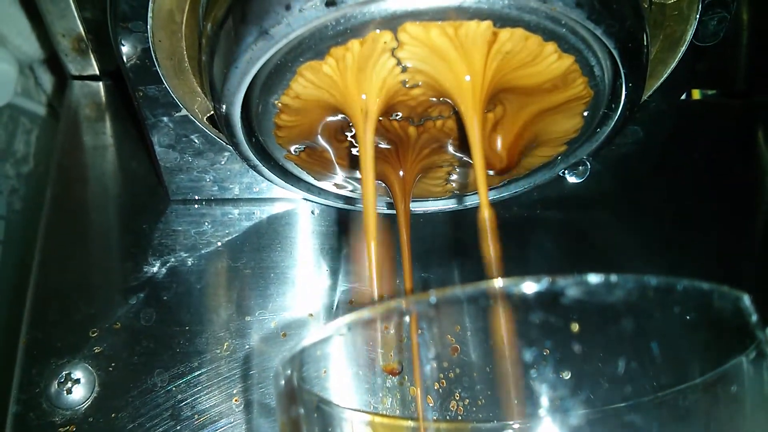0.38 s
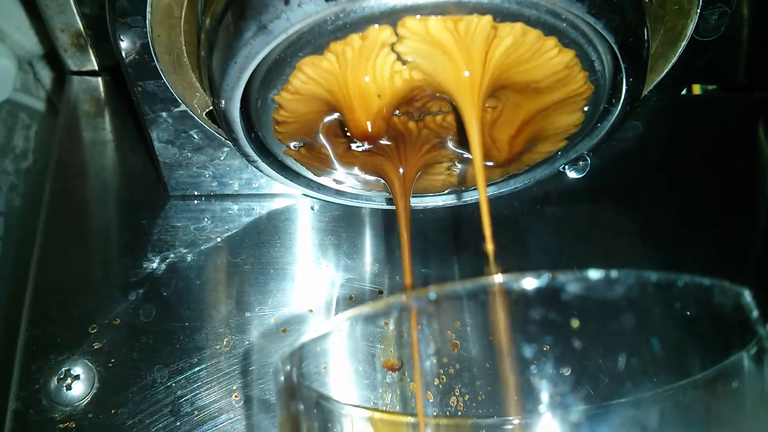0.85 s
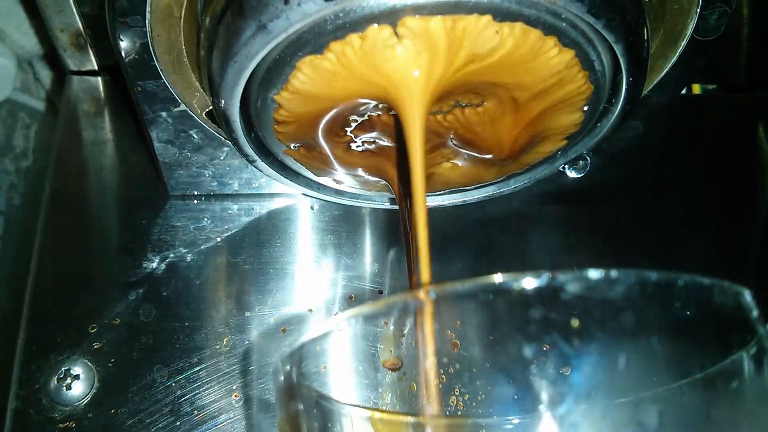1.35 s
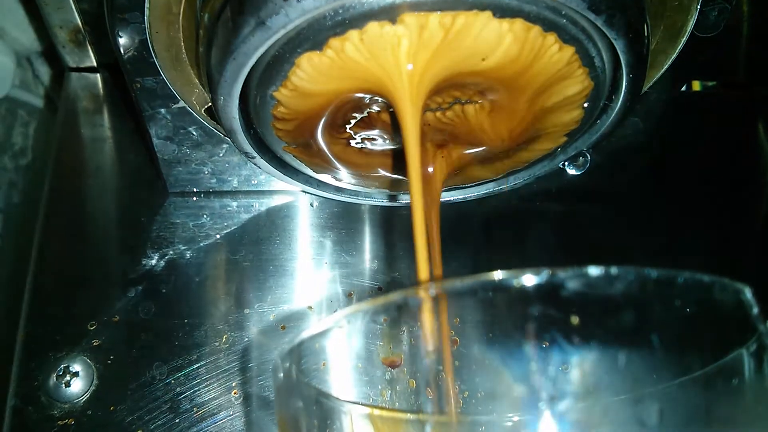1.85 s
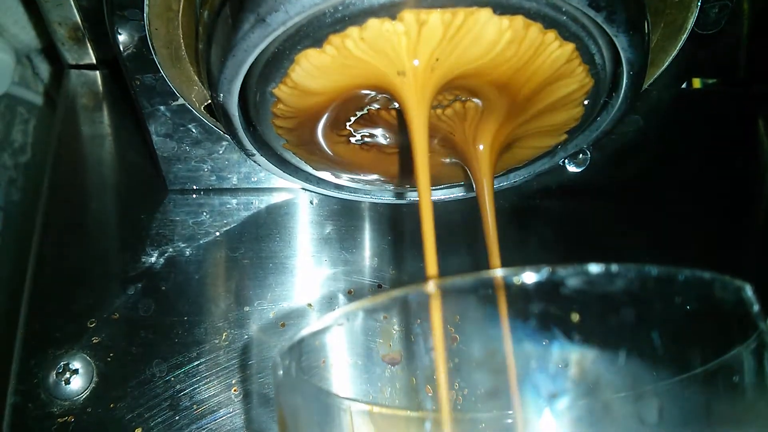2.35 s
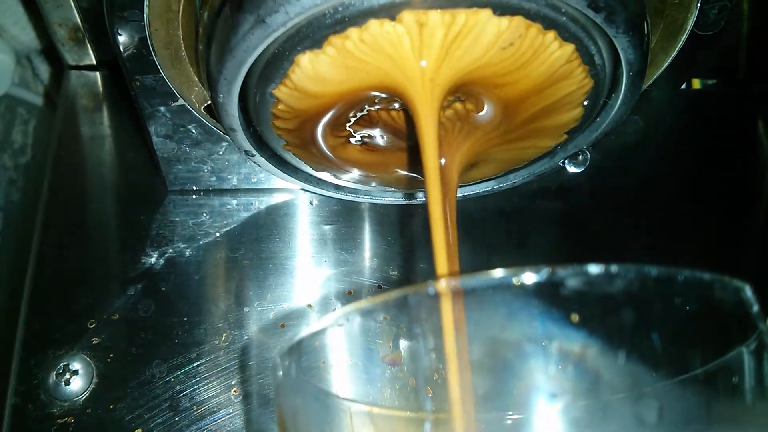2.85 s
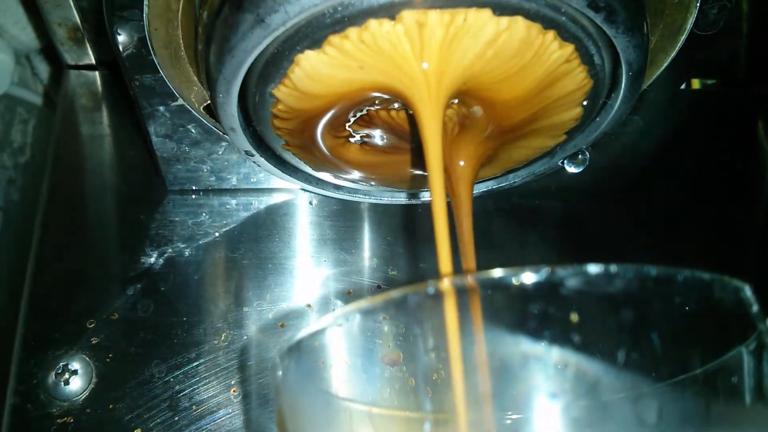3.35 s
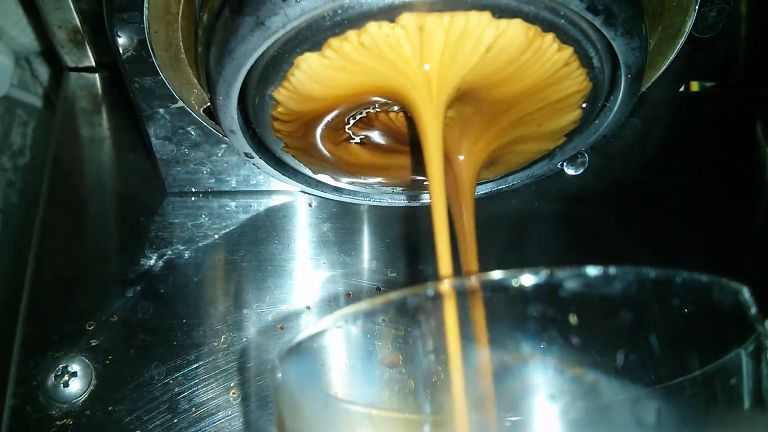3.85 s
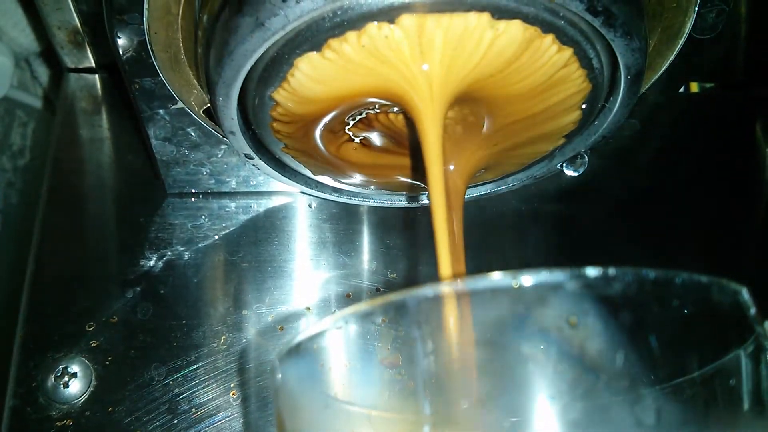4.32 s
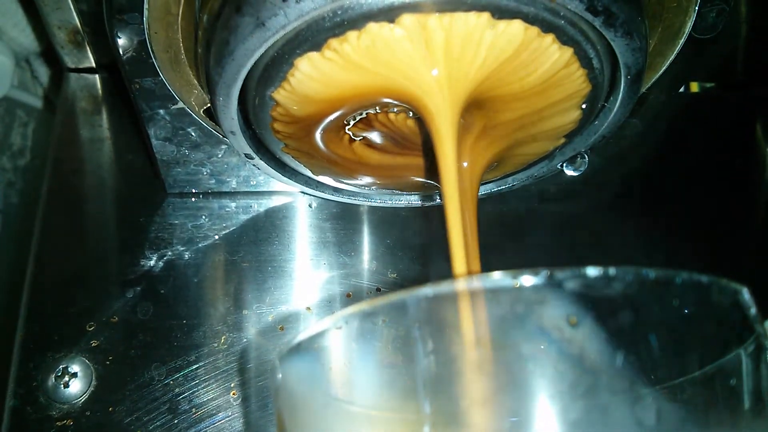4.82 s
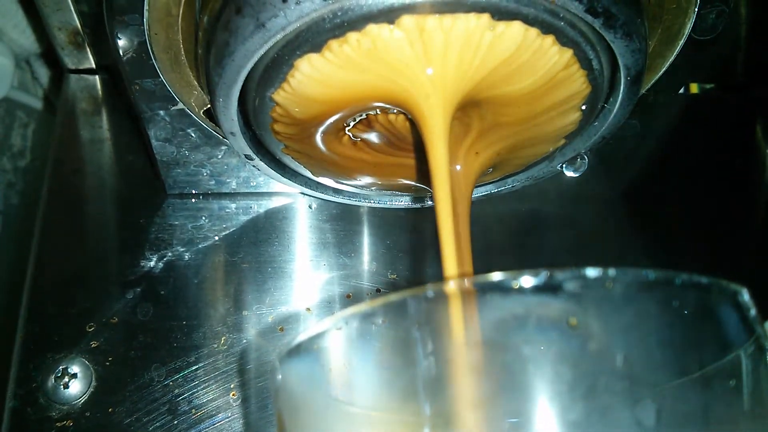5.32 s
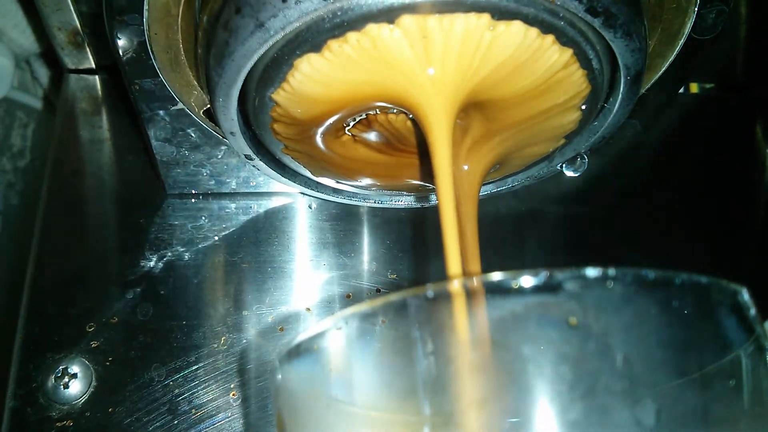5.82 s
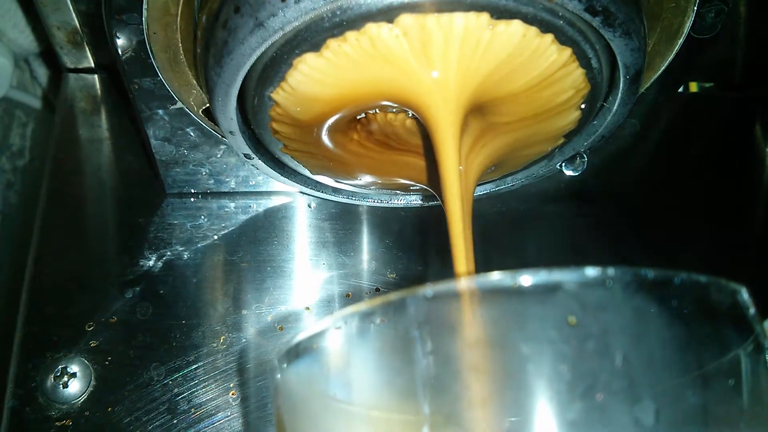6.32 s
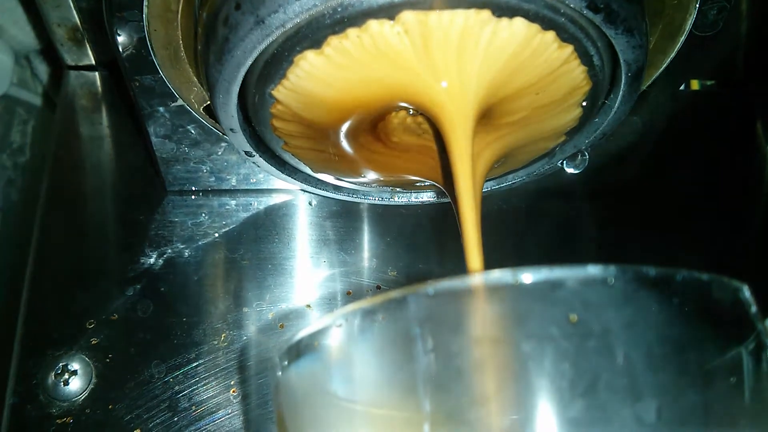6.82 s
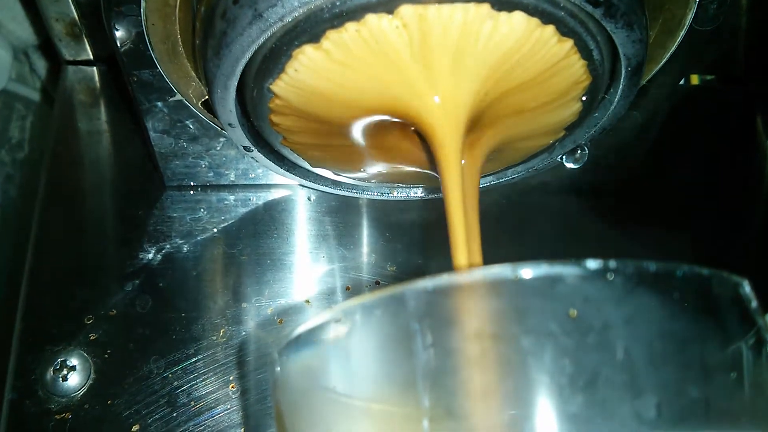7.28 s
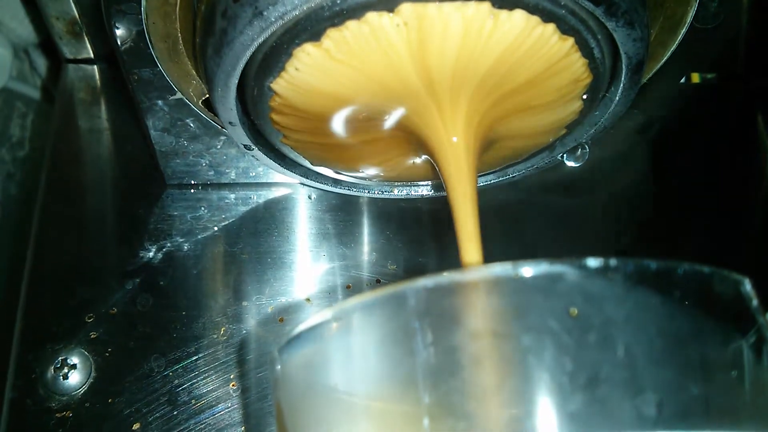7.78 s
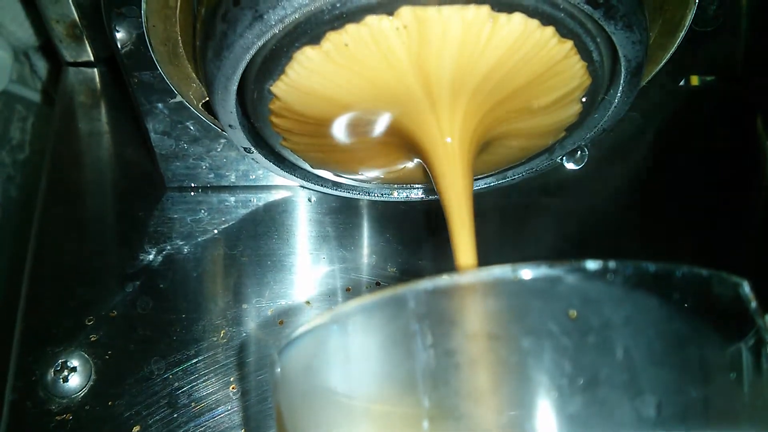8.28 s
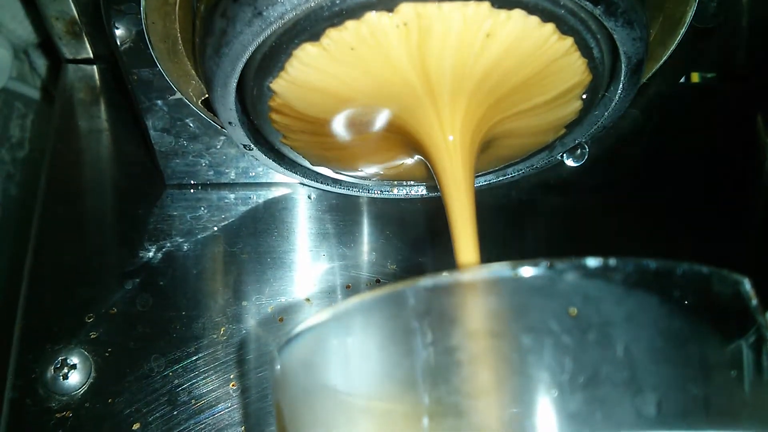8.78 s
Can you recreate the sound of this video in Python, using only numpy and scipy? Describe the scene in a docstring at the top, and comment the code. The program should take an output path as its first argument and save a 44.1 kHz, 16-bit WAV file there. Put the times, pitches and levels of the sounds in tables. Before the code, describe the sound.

Close under an espresso machine's brew head, a vibrating pump buzzes without pause at about fifty strokes a second. A loose metal part adds a crisp, fizzing rattle with irregular harder ticks. Small, short drips plink into a glass cup, mostly early on, over a soft trickle and quiet kitchen air. The buzz slowly settles and softens a little but never stops.

```python
"""Vibrating pump of an espresso machine

The pump makes one piston stroke per mains cycle, heard close under the brew head. Its casing hums as a
harmonic series on the stroke rate, with chance pushes ringing the panels through resonant modes.
A loose metal part rattles after each blow as shaped noise bursts, coffee drips into a glass cup as
decaying bubble tones, and filtered noise gives the room and the trickle."""
import sys
import numpy as np
from scipy import signal
from scipy.fft import rfft, irfft, next_fast_len
from scipy.io import wavfile
from scipy.ndimage import uniform_filter1d, map_coordinates

SR = 44100
rng = np.random.default_rng(int(sys.argv[2]) if len(sys.argv) > 2 else 0)


def decibels_to_gain(level_db):
    """Convert a level in decibels to a linear amplitude gain (20 dB per decade)."""
    exponent = np.asarray(level_db, float) / 20
    return 10 ** exponent


def store_pcm(level_fs):
    """Save levels as 16-bit WAV."""
    pcm = np.round(np.clip(level_fs, -1, 1) * 32767).astype(np.int16)
    wavfile.write(sys.argv[1], SR, np.atleast_2d(pcm).T)


N = 403515  # length in samples

# Mains frequency, which sets the stroke rate. Each row: time in seconds, frequency in Hz.
MAINS = [(0, 49.998), (5.8, 49.998), (7, 49.989), (9.2, 49.988)]
# Spectrum of the casing hum at three stages as the pressure settles: early, midway and late.
# Each row: multiple of the stroke rate, level in dB relative to the hum level.
EARLY_ORDERS = [(1, -13), (2, -22.5), (3, -18.5), (4, -10.5), (5, -1.5), (6, 1), (7, -8.5), (8, -7.5),
                (9, -5), (10, -1), (11, 1.5), (12, 0), (13, -27), (14, -20.5), (15, -17.5), (16, -9),
                (17, -11.5), (18, -11), (19, -9.5), (20, -15.5), (21, -22), (22, -36), (23, -15.5),
                (24, -15), (25, -9), (26, -42), (27, -44), (28, -19), (29, -23), (30, -15.5), (31, -24),
                (32, -16), (33, -11), (34, -10), (35, -23), (36, -4.5), (37, -15), (38, -14), (39, -19),
                (40, -38), (41, -31), (42, -58), (43, -30), (44, -54), (45, -37)]
MIDWAY_ORDERS = [(1, -12), (2, -20), (3, -14), (4, -16.5), (5, -13.5), (6, -1), (7, -13), (8, -10), (9, 2),
                 (10, -11), (11, -9.5), (12, -17.5), (13, -27), (14, -16), (15, -25.5), (16, -18),
                 (17, -37.5), (18, -20.5), (19, -17), (20, -16.5), (21, -20), (22, -30), (23, -22),
                 (24, -39), (25, -22), (26, -29), (27, -15), (28, -12), (29, -15), (30, -13), (31, -25),
                 (32, -39), (33, -60), (34, -58), (35, -37), (36, -23.5), (37, -27), (38, -16.5), (39, -18),
                 (40, -43), (41, -27.5), (42, -44), (43, -30), (44, -39), (45, -27.5)]
LATE_ORDERS = [(1, -7), (2, -16.5), (3, -6.5), (4, -0.5), (5, -11.5), (6, -3.5), (7, -14), (8, -11), (9, 1),
               (10, -7), (11, -5), (12, -11.5), (13, -31.5), (14, -15), (15, -13.5), (16, -6.5),
               (17, -22.5), (18, -9.5), (19, -10.5), (20, -11), (21, -14), (22, -19), (23, -9.5), (24, -18),
               (25, -13), (26, -44), (27, -22), (28, -16), (29, -25), (30, -15.5), (31, -18), (32, -15.5),
               (33, -30), (34, -34), (35, -24), (36, -8), (37, -17.5), (38, -16.5), (39, -26), (40, -30),
               (41, -27), (42, -32), (43, -30.5), (44, -42), (45, -23.5)]
# Course of the hum. Each row: time in seconds, hum level in dB,
# settling (0 early, 1 midway, 2 late), extra level of the deep drone near 300 Hz in dB.
HUM_COURSE = [(0, -41, 0.16, 2.5), (.8, -41.5, 0.2, -0.5), (1.5, -41.5, 0.31, -2), (2.2, -40.5, 0.47, -5),
              (3, -41, 0.71, 1), (4.3, -41.5, 0.87, -0.2), (5.2, -43, 1.3, 3.1), (6, -42, 1.37, 1.8),
              (7, -43.5, 1.49, -4), (8, -45, 1.82, 3), (9.15, -45.5, 1.93, 2)]
# Slow course of the rattle's middle band, before lulls. Each row: time in seconds, level in dB.
RATTLE_COURSE = [(0, -33), (2.8, -32.5), (3.9, -33.5), (5.2, -35), (6, -35), (6.9, -33), (8, -35.5),
                 (9.15, -34.5)]
# Strokes that slam harder. Each row: time in seconds, nominal peak in dB before the travel limit.
SLAMS = [(0.1431, -19), (0.183, -16), (0.3032, -20), (0.5641, -17), (0.623, -18.5), (0.6634, -13.5),
         (0.7432, -21), (0.824, -19.5), (0.8634, -19), (1.0031, -20), (1.063, -20), (1.0829, -18.5),
         (1.1633, -22.5), (1.263, -17), (1.3034, -18), (1.3433, -15.5), (1.4431, -19), (1.5833, -22.5),
         (1.7634, -17), (2.0632, -20), (2.0852, -21), (2.1041, -16), (2.1839, -14.5), (2.4234, -19),
         (2.4628, -18), (2.6633, -21), (2.804, -18.5), (2.9841, -20), (3.0844, -18), (3.2231, -21),
         (3.683, -18), (4.2033, -18.5), (4.2443, -23), (4.4243, -19.5), (4.5042, -17.5), (4.7431, -17),
         (5.7438, -23), (5.8232, -21.5), (6.2642, -16.5), (6.9227, -19), (7.3637, -23), (7.5233, -25),
         (7.7433, -25), (8.1439, -21), (8.2043, -21), (8.3833, -22), (8.8443, -17.5), (9.0024, -23)]
# Modes of the rattling part. Each row: centre in Hz, width in Hz, gain over the broad colour in dB.
PART_MODES = [(3920, 370, -9.5), (4690, 71, -5.5), (5730, 58, -4.5), (6070, 64, 2.5), (6544, 72, 6),
              (6990, 45, 3), (7296, 220, 1.5), (7570, 88, -2), (8090, 35, 4), (8150, 64, -7),
              (8300, 39, -14.5), (8810, 115, -3), (8890, 44, -3.5), (10760, 160, -8), (11480, 180, -8),
              (13200, 73, -16), (13500, 90, -7), (15200, 150, -6)]
# Broad colour of the rattle. Each row: frequency in Hz, relative density in dB per Hz.
SIZZLE = [(3300, -32), (3900, -18.5), (4400, -25), (4700, -20), (5400, -16.5), (5800, -9.5), (6900, -9),
          (7350, -3), (8800, .5), (9300, -3.5), (9600, -11), (13500, -14), (15000, -15.5), (15800, -20)]
# Rattle strength within one stroke. Each row: share of the cycle, relative level in dB.
STROKE_SHAPE = [(0, -15.5), (.1, -14), (.12, -5), (.2, -1.6), (.45, -3), (.6, -7), (.78, -10.5),
                (.88, -14.5), (1, -15)]
# Drops into the cup. Each row: start in seconds, nominal peak in dB, nominal pitch in Hz,
# time to decay by 60 dB in seconds.
DROPS = [(.197, -19, 1360, 0.012), (0.521, -32, 1780, 0.012), (.72, -31, 1500, .015),
         (1.253, -27.5, 1500, 0.013), (1.35, -34, 850, 0.038), (1.826, -22, 1420, 0.012),
         (1.83, -31, 1530, 0.021), (1.829, -26.5, 516, 0.028), (2.2, -35, 500, .04),
         (3.073, -34, 1960, 0.011), (3.074, -35, 5100, 0.016), (3.683, -34, 958, 0.021),
         (4.832, -37, 830, 0.022), (4.92, -37, 1950, 0.01), (6.264, -34, 2120, 0.006),
         (6.951, -42, 800, .04), (7.399, -38, 1990, 0.013), (8.383, -38, 825, 0.029),
         (8.77, -40, 1700, .015), (9.0, -37, 1010, 0.018)]
# Casing panels. Each row: centre in Hz, width in Hz, moment of the blow as a share of the cycle,
# then relative level early, midway and late in dB.
PANELS = [(180, 49, .215, -20, -15, -7), (297.5, 46, .795, -2, -6.5, -4), (450, 126, .5, -5, -3.5, -7.5),
          (528.8, 92, .795, 1, -11.5, -12), (820, 60, .075, -12, -7.5, -2),
          (966, 137, .255, -2, -10.5, -3.5), (1230, 95, .24, -3, -9.5, -5.5),
          (1488, 133, .51, -5.5, -2.5, -5), (1832, 164, .035, -3, -12, -7.5),
          (2424, 99, .415, -12, -17, -21), (2608, 105, .315, -19, -12, -13),
          (2952, 74, .31, -18, -18, -9.5)]
# Room and trickle noise. Each row: frequency in Hz, relative density in dB per Hz.
ROOM_COLOUR = [(22, -15), (40, -3), (62, -1), (88, -7), (120, -12), (200, -19), (450, -30), (660, -18),
               (1000, -10), (1650, -13.5), (1900, -13), (2150, -17), (2700, -19), (3200, -23), (4500, -46)]
# Spells when the loose part sits tighter. Each row: start in seconds, length in seconds,
# drop of the middle band in dB.
LULLS = [(0.412, .12, 2.5), (1.384, 0.27, 2), (1.67, 0.084, 3.5), (1.87, 0.2, 1), (2.306, 0.39, 2),
         (2.883, 0.11, 3), (3.38, 0.19, 3.5), (3.976, 0.45, 3), (4.812, .17, 1), (5.297, .13, 4),
         (5.537, 0.25, 5.5), (5.98, 0.13, 3), (6.516, 0.14, 4.5), (6.76, 0.11, 2.5), (7.0, 0.89, 4),
         (8.258, .1, 3.5), (8.6, 0.11, 2.5)]
# Outer bands of the rattle. Each holds: mean level in dB, share of the middle band's slow changes
# that it follows, gain in dB as the pressure settles from early to midway.
TREBLE = (-42, 0.56, -.5)
LOW_EDGE = (-56, 0.14, 4.6)
# A spell of brighter treble. It holds: start in seconds, length in seconds, centre in Hz,
# width in Hz, gain in dB.
BRIGHT = (2.9, 1.08, 13500, 500, -4)
# Small chance drips. It holds: nominal peak in dB, its scatter in dB, middle pitch in Hz,
# scatter of the pitch's natural logarithm, time to decay by 60 dB in seconds.
DRIPS = (-46, 2, 1000, .25, .02)


def hum(cycles):
    """Fourier series of a periodic force: like strokes sound as steady orders, each wavering a little."""
    waver_db, phase_scatter, sway = 1.2, 0.085, 0.31  # phases in radians
    thin_db = -13.5  # orders above the tables ring only near a panel, this far under it
    level_db, settling, drone_db = curves(HUM_COURSE)
    nominal_hz = MAINS[0][1]
    orders = np.array(EARLY_ORDERS)[:, 0]
    stages = np.array([EARLY_ORDERS, MIDWAY_ORDERS, LATE_ORDERS])[:, :, 1]
    thin = np.arange(len(orders) + 1, 61)
    near = sum(decibels_to_gain(midway_db) * np.abs(resonance(thin * nominal_hz, hz, width)) ** 2
               for hz, width, _, _, midway_db, _ in PANELS)
    thin_levels = thin_db + 20 * np.log10(near)
    orders = np.r_[orders, thin]
    stages = np.c_[stages, np.tile(thin_levels, (3, 1))]
    # an order starts when the panels near it are struck
    struck = sum(resonance(orders * nominal_hz, hz, width) * np.exp(-2j * np.pi * orders * moment)
                 for hz, width, moment, *_ in PANELS)
    phases = np.angle(struck) + phase_scatter * rng.standard_normal(len(orders))
    out = np.zeros(N)
    for order, levels, phase in zip(orders, stages.T, phases):
        loose = min(order / 8, 1.6)  # high orders are less steady
        order_db = np.interp(settling, [0, 1, 2], levels)
        order_db += waver_db * loose * wobble(9)
        order_db += drone_db * np.exp(-(order - 5.8) ** 2 / 2)
        angle = 2 * np.pi * order * cycles + phase + sway * loose * wobble(14)
        out += decibels_to_gain(order_db) * np.cos(angle)
    return np.sqrt(2) * decibels_to_gain(level_db) * out


def stroke_force(cycles, level_db):
    """Impact strength in dB varies by chance from stroke to stroke, with harder slams at given times."""
    scatter_db, crest_db, jolt = 1.92, 10, 0.41
    travel_db = 5.5  # the part's free travel limits how hard it can hit
    since = cycles - STROKE_SHAPE[1][0]
    stroke = np.floor(since).astype(int) + 1
    size_db = scatter_db * rng.standard_normal(stroke[-1] + 1) - 2.0
    for s, peak_db in SLAMS:
        over_db = peak_db - crest_db - level_db[round(s * SR)]
        size_db[stroke[round((s + .003) * SR)]] = min(over_db, travel_db)
    # a hard stroke is stronger most of all at its start
    return size_db[stroke] * (0.49 + jolt * np.exp(-(since % 1 / 0.19) ** 2))


def contact_noise(cycles):
    """Many tiny contacts add up to noise, of which a part repeats from stroke to stroke."""
    repeat, grit_db = 0.19, 0.6  # repeat: share of the power
    length = SR // 50
    pattern = rng.standard_normal((12, length)) * decibels_to_gain(grit_db * rng.standard_normal(length))
    # the repeated pattern drifts slowly through twelve versions
    version = np.linspace(0, len(pattern) - 1, N)
    same = map_coordinates(pattern, [version, np.floor(cycles % 1 * length)], order=1)
    fresh = rng.standard_normal(N) * decibels_to_gain(grit_db * wobble(900))
    contacts = np.sqrt(repeat) * unit(same) + np.sqrt(1 - repeat) * unit(fresh)
    # each stroke excites a slightly different mix of modes
    return patchy(contacts, 1.7)


def rattle(cycles):
    """Impact excitation of modes: each blow sets off a burst of contacts that the loose part colours."""
    treble_share, low_share = 0.35, 0.72  # how far the outer bands follow the force of the stroke
    settled = np.clip(curves(HUM_COURSE)[1], 0, 1)
    level_db = curves(RATTLE_COURSE)[0]
    level_db = level_db - sum(db * spell(s, length) for s, length, db in LULLS)

    def outer_level(mean_db, share, gain_db):
        """Level of a band that follows the middle band and the settling only in part."""
        slow_db = share * (level_db - level_db.mean())
        return mean_db + slow_db + gain_db * (settled - settled.mean())

    def body(f):
        """Spectral envelope: modes added to a broad colour."""
        modes = sum(decibels_to_gain(db) * resonance(f, hz, width) for hz, width, db in PART_MODES)
        return colour(SIZZLE)(f) * (1 + modes)

    force_db = stroke_force(cycles, level_db)
    contacts = contact_noise(cycles)
    burst_db = np.interp(cycles % 1, *np.transpose(STROKE_SHAPE))
    middle_hits = contacts * decibels_to_gain(burst_db + force_db)
    treble_hits = contacts * decibels_to_gain(burst_db + treble_share * force_db)
    low_hits = contacts * decibels_to_gain(low_share * (burst_db + force_db))
    middle = filtered(middle_hits, lambda f: body(f) * (f > 5300) * (f < 9500))
    treble = unit(filtered(treble_hits, lambda f: body(f) * (f >= 9500)))
    low = filtered(low_hits, lambda f: body(f) * (f > 3300) * (f <= 5300))
    start, span, hz, width, db = BRIGHT
    brighter = filtered(treble, lambda f: resonance(f, hz, width) + 0.19)
    treble = treble + spell(start, span) * decibels_to_gain(db) * brighter
    out = decibels_to_gain(level_db) * unit(middle)
    out += decibels_to_gain(outer_level(*TREBLE)) * treble
    return out + decibels_to_gain(outer_level(*LOW_EDGE)) * unit(low)


def shake(cycles):
    """Impulse response of the panels: each gets a few chance pushes per stroke and rings them out."""
    over_hum_db, surge_db = -6, 2.2
    spread = .14  # scatter of the pushes as a share of the cycle
    hum_db, settling, _ = curves(HUM_COURSE)
    starts = np.searchsorted(cycles, np.arange(int(cycles[-1])))
    out = np.zeros(N)
    for hz, width, moment, *levels in PANELS:
        size, late = rng.standard_normal((2, len(starts), 4))
        delay = (moment + spread * late) * SR / MAINS[0][1]
        at = np.clip(starts[:, None] + delay, 0, N - 1).astype(int)
        pushes = np.bincount(at.ravel(), size.ravel(), N)
        ring = filtered(pushes, lambda f: resonance(f, hz, width) * resonance(f, hz, 3 * width))
        out += decibels_to_gain(np.interp(settling, [0, 1, 2], levels)) * unit(ring)
    return decibels_to_gain(hum_db + over_hum_db + surge_db * wobble(9)) * unit(out)


def drops():
    """Bubble resonance: each drop traps a bubble that rings briefly, its pitch climbing at first."""
    rise, drip_count = 0.092, 60
    out, t = np.zeros(N + SR), np.arange(SR // 10) / SR
    peak_db, scatter_db, middle_hz, spread, life = DRIPS
    chance = np.c_[rng.random(drip_count), rng.standard_normal((drip_count, 2))]
    drips = [(u * N / SR, peak_db + scatter_db * a, middle_hz * np.exp(spread * b), life)
             for u, a, b in chance]
    bend = 1 - rise + rise * t / 0.0028 * np.exp(-t / .02)
    attack = 1 - np.exp(-t / 0.00044)
    for s, db, hz, t60 in DROPS + drips:
        tone = np.sin(2 * np.pi * hz * t * bend)
        # 5 dB make up for the decay during the attack
        out[round(s * SR):][:len(t)] += decibels_to_gain(db + 5 - 60 * t / t60) * attack * tone
    return out[:N]


def room():
    """Broadband noise: the kitchen with the soft trickle of the stream, its level wavering slightly."""
    noise = filtered(rng.standard_normal(N), colour(ROOM_COLOUR))
    return decibels_to_gain(-57 + 1.8 * wobble(4)) * unit(noise)


def resonance(f, hz, width):
    """Damped oscillator: causal response of one mode, 1 at its centre."""
    return 1j * f * width / (hz * hz - f * f + 1j * f * width)


def patchy(x, depth_db):
    """Short-time spectral modulation: chance gains over patches of time and pitch."""
    z = signal.stft(x, nperseg=256)[2]
    field = uniform_filter1d(rng.standard_normal(z.shape), size=4, axis=0)
    field = uniform_filter1d(field, size=8, axis=1)
    return signal.istft(z * decibels_to_gain(depth_db * unit(field)), nperseg=256)[1][:N]


def spell(start, length):
    """Gating window: 1 during a span of time, 0 outside, with edges of 30 ms."""
    t = np.arange(N) / SR
    return np.clip(np.minimum(t - start, start + length - t) / .03 + .5, 0, 1)


def unit(x):
    """Normalisation to an rms value of 1."""
    return x / np.sqrt(np.mean(x ** 2) + 1e-20)


def curves(rows):
    """Linear interpolation: one value per sample for each column after the time."""
    s, *cols = np.transpose(rows)
    return [np.interp(np.arange(N) / SR, s, c) for c in cols]


def filtered(x, response):
    """Convolution theorem: the spectrum of x times a complex response of frequency."""
    m = next_fast_len(N + 8192)
    return irfft(rfft(x, m) * response(np.fft.rfftfreq(m, 1 / SR)), m)[:N]


def colour(points):
    """Spectral envelope: gain through (Hz, dB) points on a logarithmic frequency axis."""
    f, db = np.transpose(points)
    return lambda hz: decibels_to_gain(np.interp(np.log(hz + 1), np.log(f + 1), db))


def wobble(rate):
    """Slow random modulation: straight lines between chance values, rate of them a second."""
    knots = int(N * rate / SR) + 2
    return np.interp(np.arange(N), np.arange(knots) * SR / rate, rng.standard_normal(knots))


def scene():
    """Superposition of the sources: all parts of the pump keep time with the mains."""
    cycles = np.cumsum(curves(MAINS)[0]) / SR
    return (hum(cycles) + rattle(cycles) + shake(cycles) + drops() + room())[None]


def top_cut(x):
    """Nothing passes above the cut-off."""
    return signal.sosfilt(signal.butter(12, 15890, fs=SR, output="sos"), x)


def record(dry):
    """Linear filtering: the housing dulls one narrow band, and nothing passes above the band limit."""
    housing = filtered(dry[0], lambda f: 1 - 0.74 * resonance(f, 3230, 300))
    limited = filtered(housing, lambda f: f < 15850)
    return top_cut(limited[None])


dry = scene()
out = record(dry)
store_pcm(out)
```